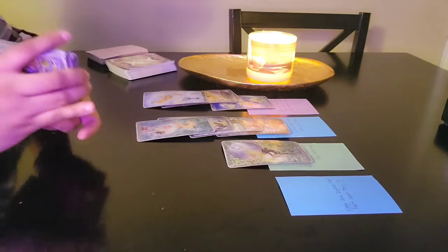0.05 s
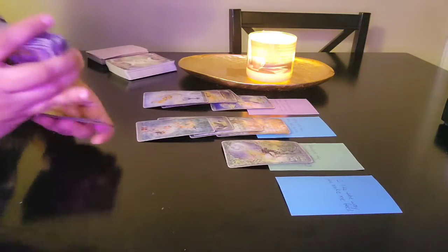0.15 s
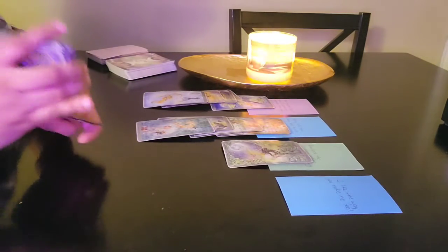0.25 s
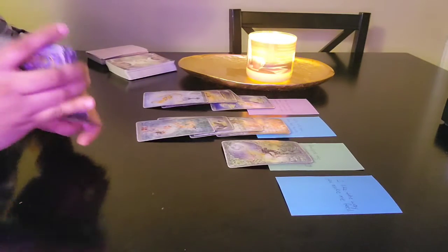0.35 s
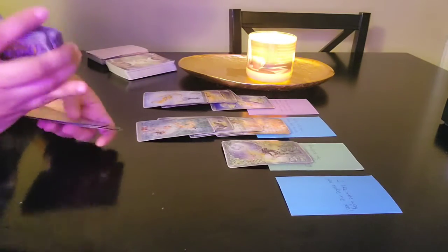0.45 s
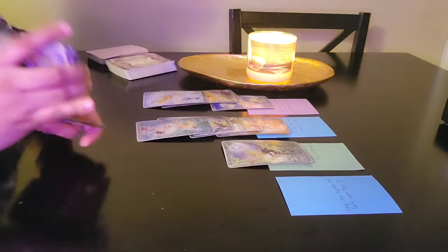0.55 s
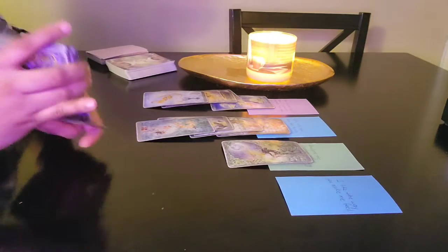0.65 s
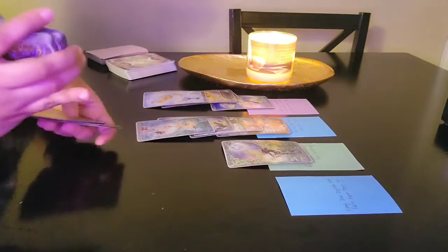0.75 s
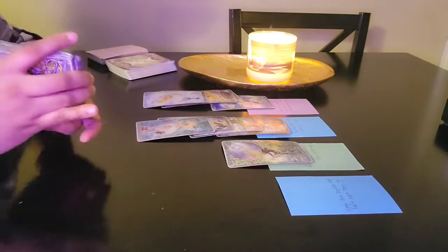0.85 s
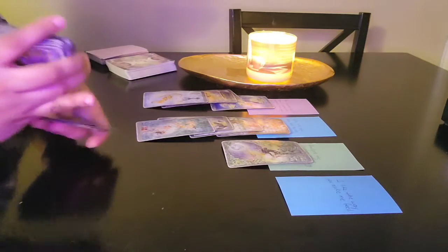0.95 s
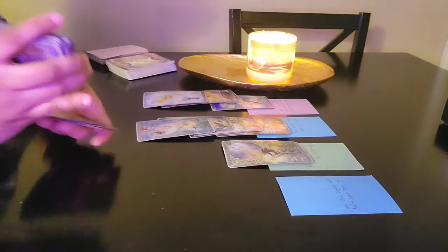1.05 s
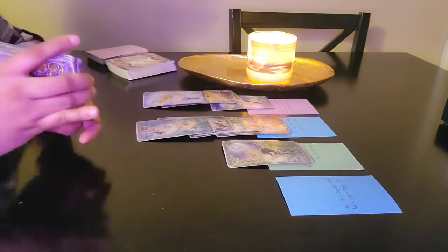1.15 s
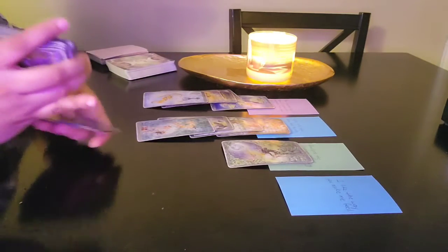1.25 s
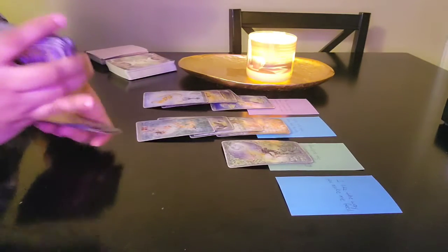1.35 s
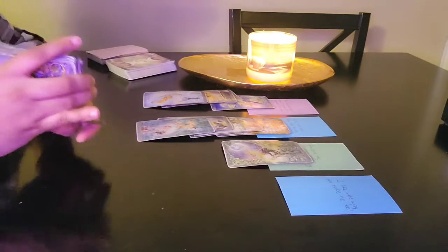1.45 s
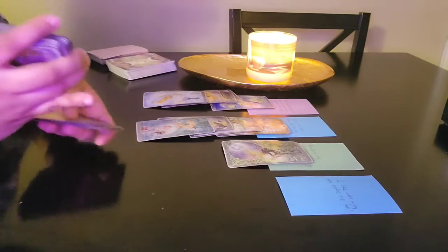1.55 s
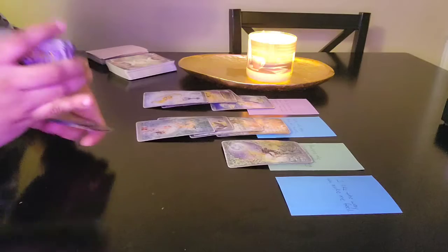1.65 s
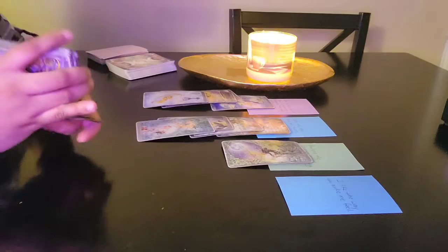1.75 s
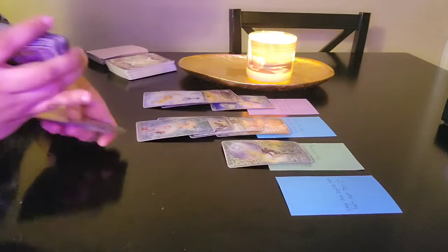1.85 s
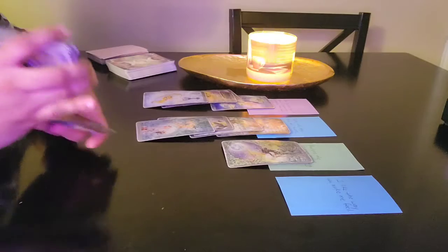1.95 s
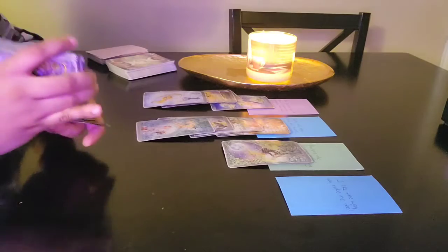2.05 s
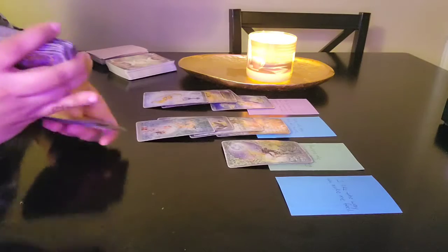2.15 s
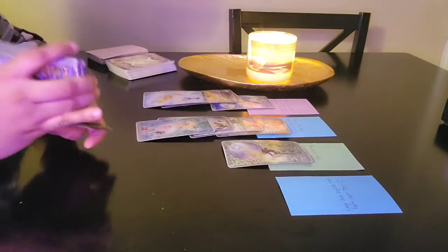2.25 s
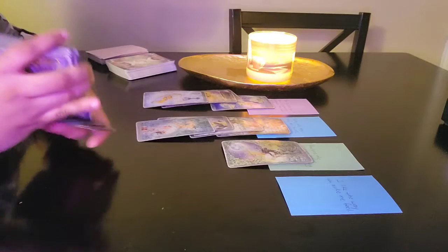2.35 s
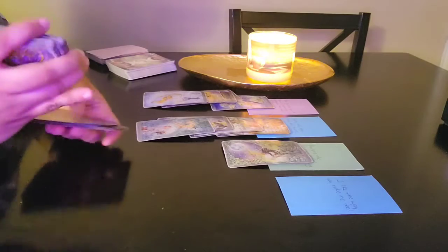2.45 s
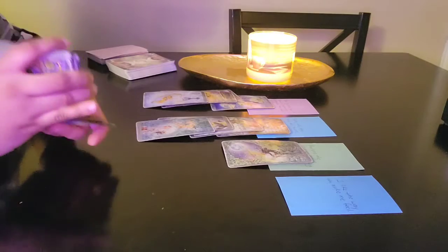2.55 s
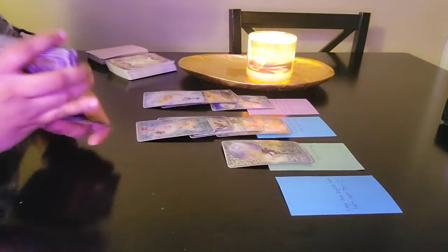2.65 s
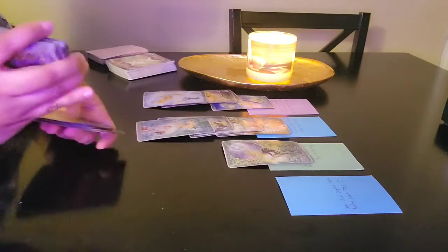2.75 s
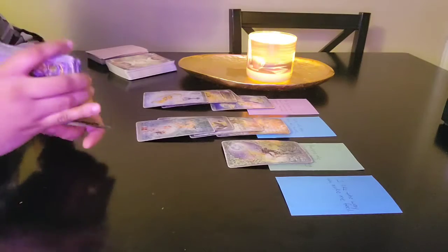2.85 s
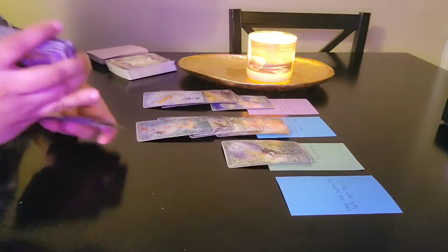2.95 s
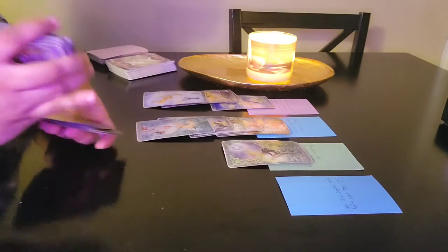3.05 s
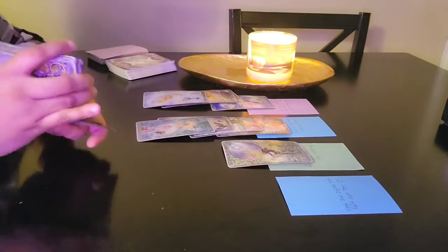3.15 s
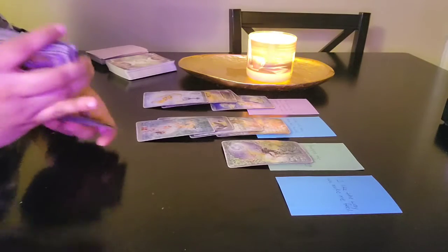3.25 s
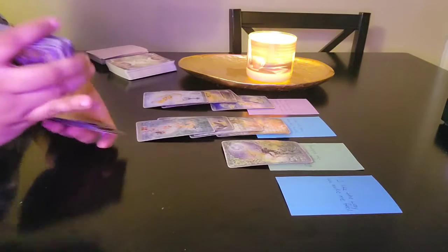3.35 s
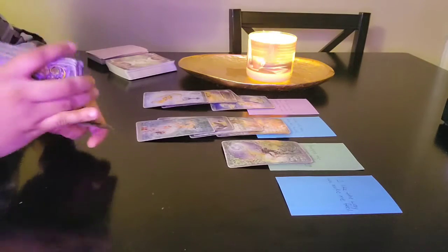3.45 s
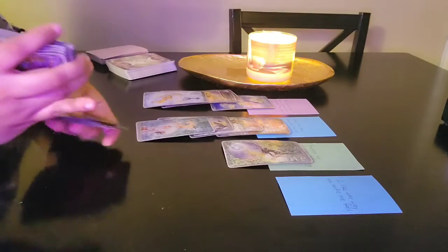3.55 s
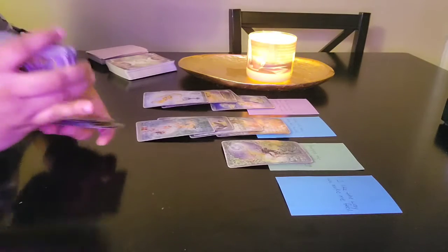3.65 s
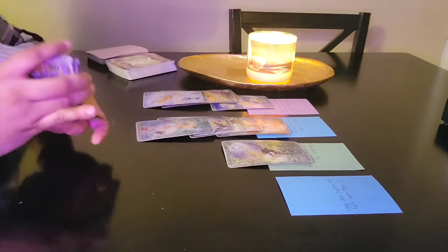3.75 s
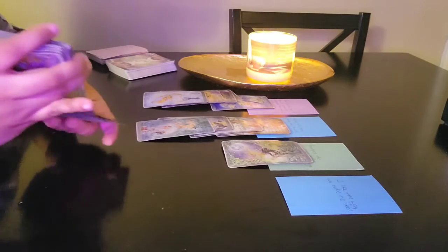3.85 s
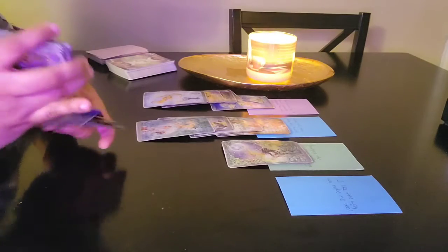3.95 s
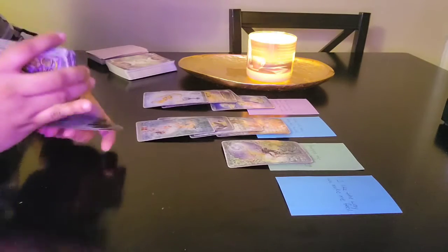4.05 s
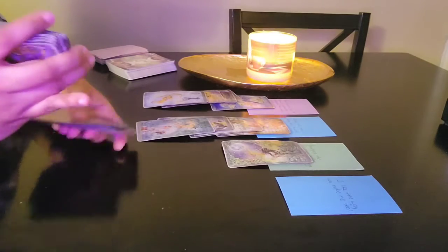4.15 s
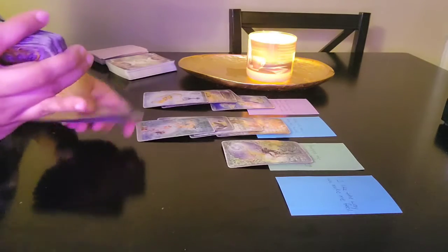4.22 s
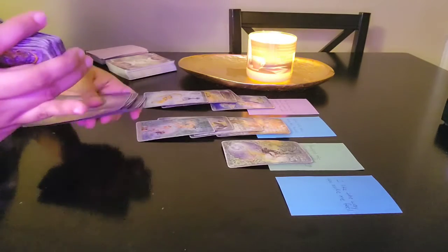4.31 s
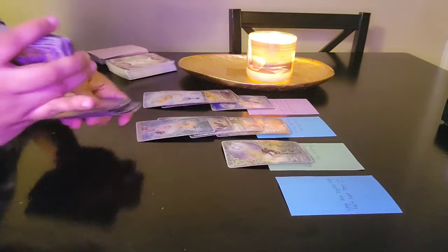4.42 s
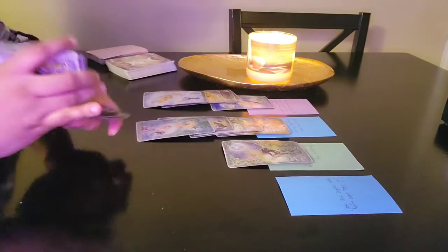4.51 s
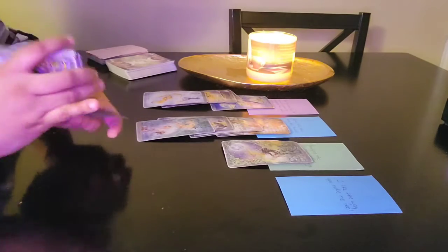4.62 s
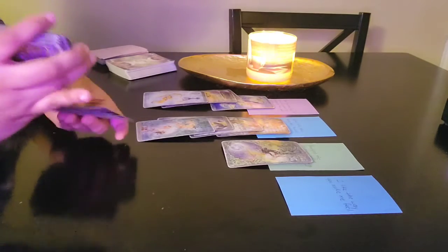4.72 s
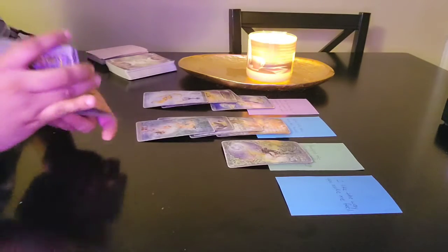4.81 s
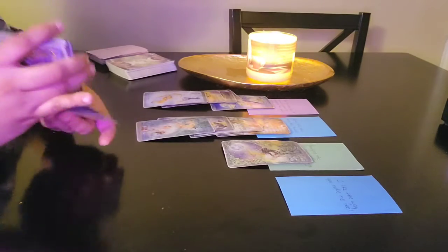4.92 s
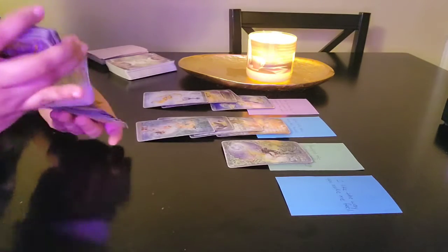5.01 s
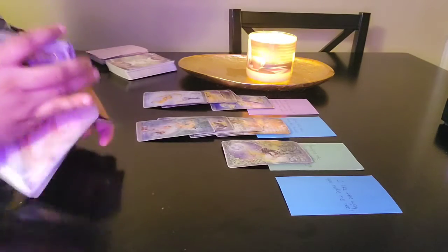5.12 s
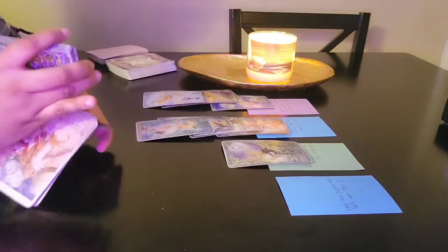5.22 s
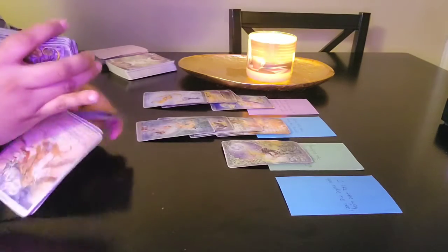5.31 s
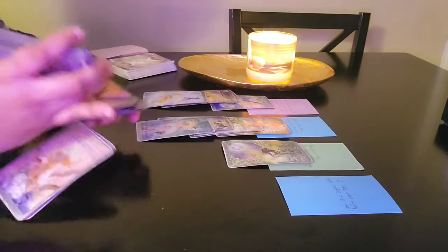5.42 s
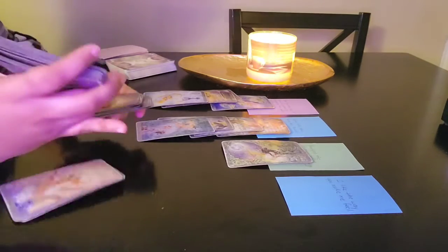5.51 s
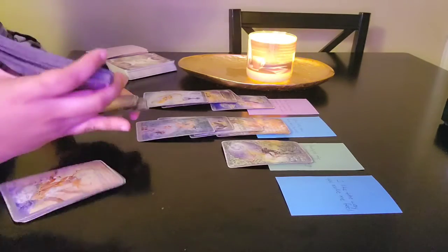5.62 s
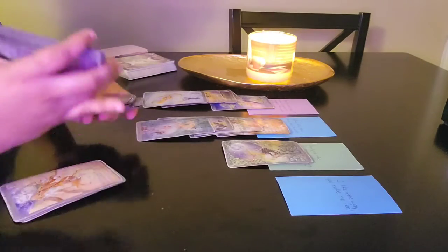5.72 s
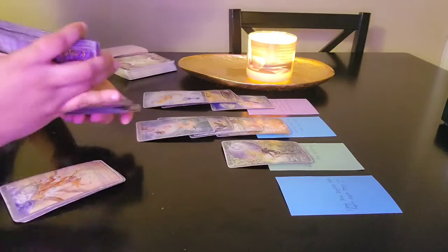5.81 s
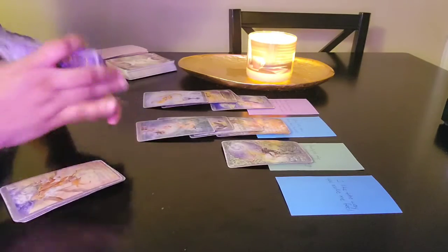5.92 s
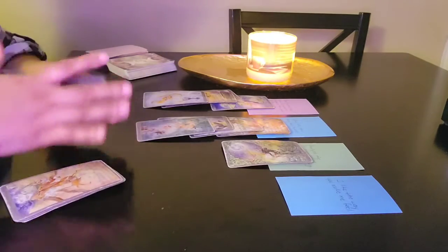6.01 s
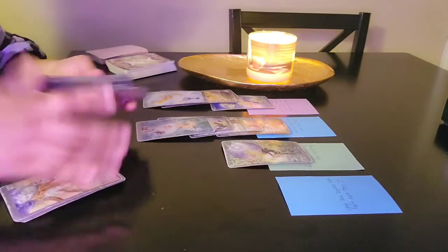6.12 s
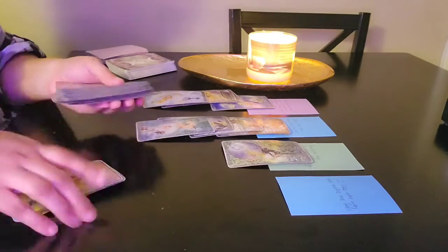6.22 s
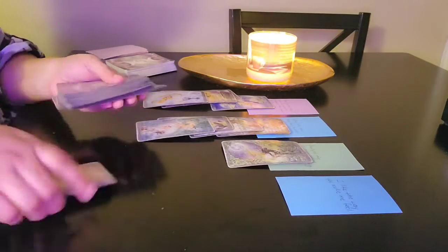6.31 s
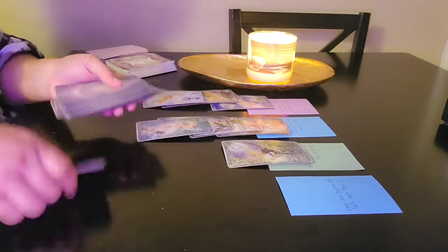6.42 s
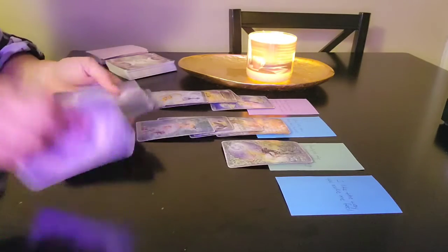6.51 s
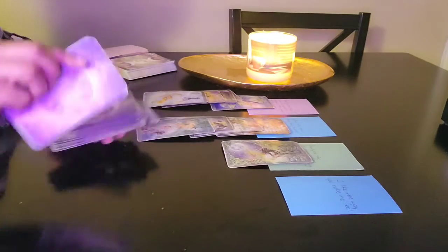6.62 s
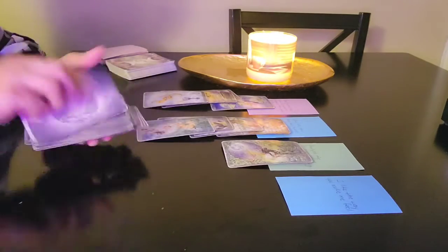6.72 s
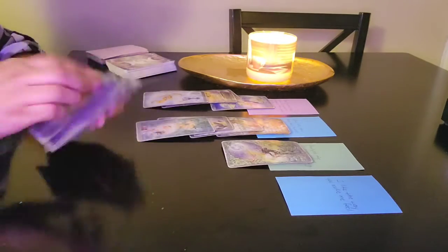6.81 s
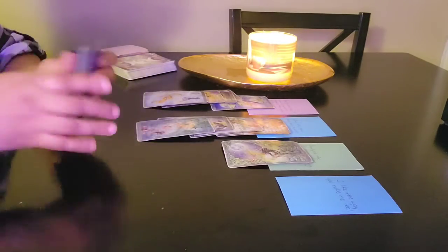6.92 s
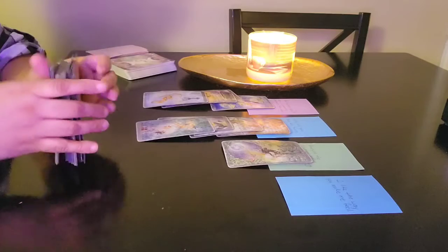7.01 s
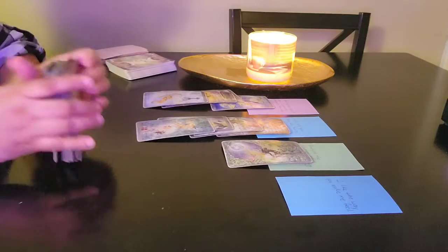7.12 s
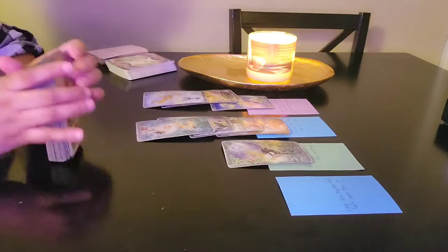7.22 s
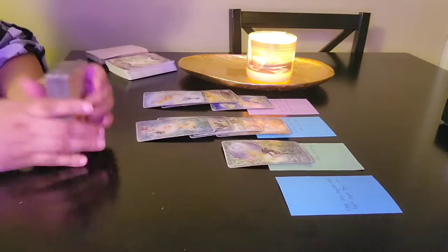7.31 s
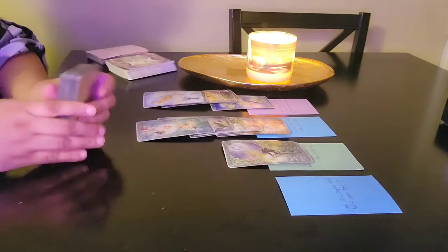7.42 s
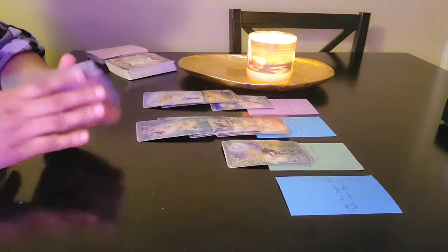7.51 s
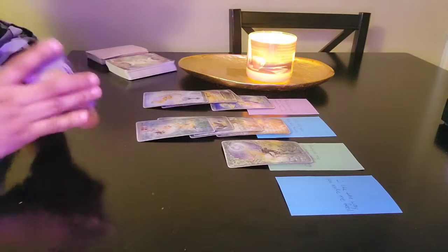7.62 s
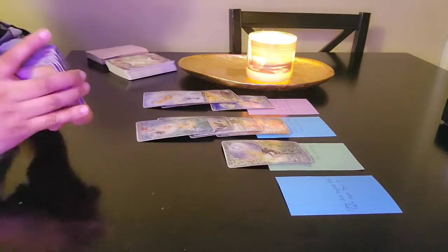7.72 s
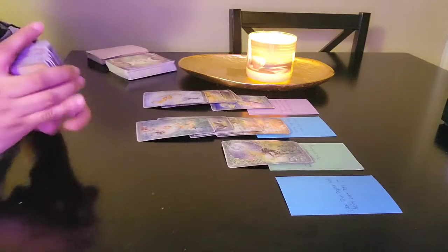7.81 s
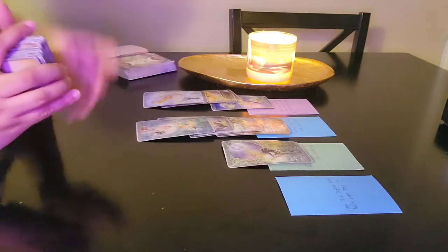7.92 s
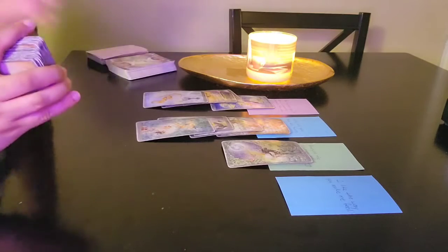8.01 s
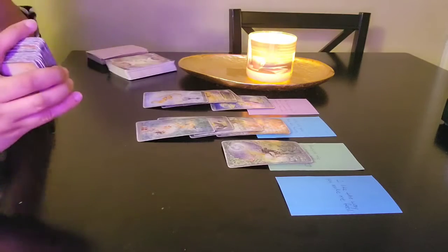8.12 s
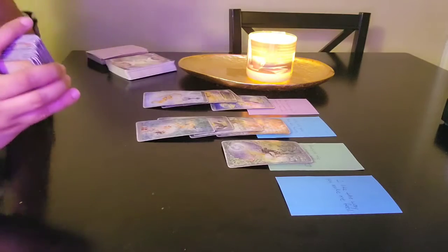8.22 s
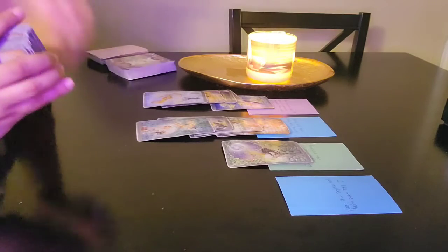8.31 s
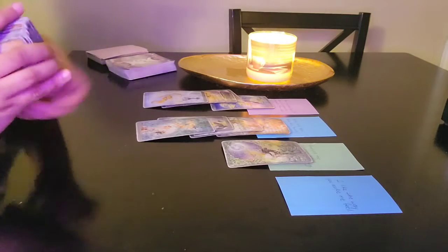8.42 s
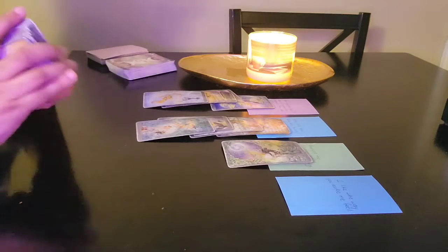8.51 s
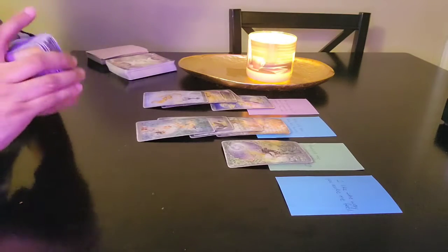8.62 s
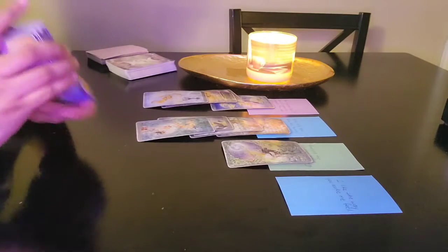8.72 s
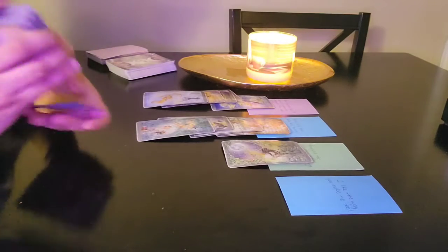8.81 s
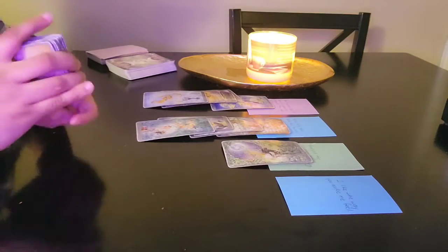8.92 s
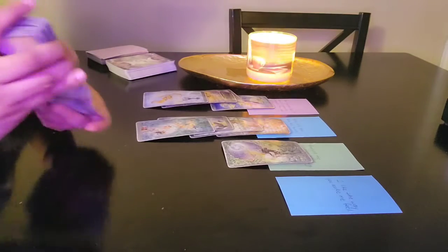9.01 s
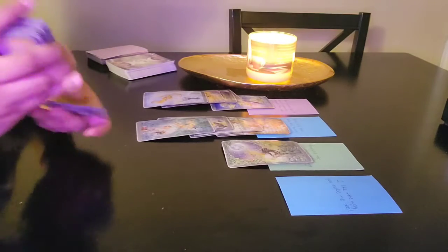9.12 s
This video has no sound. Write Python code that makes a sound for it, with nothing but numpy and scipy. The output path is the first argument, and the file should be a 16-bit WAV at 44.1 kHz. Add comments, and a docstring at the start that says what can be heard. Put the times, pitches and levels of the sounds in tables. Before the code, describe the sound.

Hands quickly overhand shuffle stiff cards: soft tick, swelling rub, bright snap and slap, repeated evenly. The shuffling then grows sparse, with light rustles, a soft card landing on the tabletop, and faint sliding friction. The deck is tapped twice hard on wood, quiet handling fades, and shuffling restarts with strong slaps at the end. Close, dry pickup with short room reflections and low quiet background air.

```python
"""Overhand card shuffle

Hands shuffle a deck of large cards above a wooden table: packets rub out as hiss, and ringing air pockets clap.
One card drops, cards skid on the table top, and two hard knocks, noise bursts over wood modes, square the deck.
A small bare room answers with decaying noise over a soft murmur of filtered noise.
"""
import sys
import numpy as np
from scipy import signal
from scipy.fft import rfft, irfft, next_fast_len
from scipy.io import wavfile
from scipy.ndimage import uniform_filter1d, minimum_filter1d, map_coordinates

SR = 44100
rng = np.random.default_rng(int(sys.argv[2]) if len(sys.argv) > 2 else 0)


def to_wav(s):
    """Save 16-bit WAV."""
    ch = np.atleast_2d(s).T  # columns
    pcm = np.round(np.clip(ch, -1, 1) * 32767)  # PCM
    wavfile.write(sys.argv[1], SR, pcm.astype(np.int16))


N = 403956

# Hard meetings of card edges and faces. Each row: time in seconds, clap in dB, air pocket in Hz, edge snap in dB.
FLICKS = [(0.0099, -13.5, 870, -23), (0.171, -21, 3200, -29),(0.207, -18.5, 2800, -23),
          (0.2233, -14, 2730, -13.5), (0.2624, -10, 3120, -13), (0.2833, -8, 2160, -8),
          (0.4936, -26, 3510, -13), (0.5439, 0.5, 3660, -32), (0.5585, -6, 2210, -4),
          (0.7805, -6, 4780, -8), (0.8255, -21, 2180, -15), (0.835, -22, 2530, -5.5),
          (0.8511, -2, 1920, -4), (1.047, -17, 3140, -22.5), (1.109, -2, 3770, -3),
          (1.1229, 0.5, 2240, -4.5), (1.1315, -11.5, 1320, -18), (1.329, -17, 3300, -20),
          (1.3354, -17, 3770, -17.5), (1.3935, -13, 930, -6.5), (1.4085, 1.5, 1860, -5.5),
          (1.6364, -10.5, 3560, -14), (1.6726, -3.5, 1980, -5), (1.6811, 0.5, 1970, -33),
          (1.6945, -4, 2090, -4), (1.916, -33, 2054, -14.5), (1.9561, -11, 830, -11.5),
          (1.9624, 2.5, 3600, -13.5), (1.979, 1.5, 2070, -13), (1.9835, -3, 1760, -8),
          (2.209, -11, 2110, -16.5), (2.246, -18, 1500, -21.5), (2.253, -0.5, 3350, -31.5),
          (2.2734, 1.5, 1450, -4), (2.47, -3.5, 3350, -16), (2.5324, -15.5, 730, 0.5),
          (2.5454, 8.5, 2030, -16), (2.5489, -3, 2040, -5.5), (2.7489, -14, 3800, -26.5),
          (2.7978, -6, 2000, -18.5), (2.8085, 0, 1990, -2), (2.8159, -7.5, 1730, -3.5),
          (2.8201, -2, 1960, -30), (2.825, 4, 2040, 0.5), (3.0496, -11.5, 1980, -13.5),
          (3.087, -4.5, 1550, -16), (3.0912, -2.5, 1680, -8.5), (3.1153, -2, 1560, 1.5),
          (3.334, -11, 3420, -16), (3.3977, -15, 1700, -13.5), (3.4223, -2.5, 1080, -2),
          (3.6259, -4, 3100, -14.5), (3.6935, -3, 2410, -9), (3.7076, 6, 2150, -30), (3.7121, -4, 1820, -7),
          (3.8891, -16, 3800, -13), (3.9906, 0.5, 2520, 1.5), (4.0701, -18, 1200, -26.5),
          (4.104, -26, 1400, -13.5), (4.1315, 9.5, 1820, 6.5), (4.192, -25, 4500, -18.5),
          (4.7054, -1, 2120, -26.5), (4.9987, -9, 2320, -16.5), (5.0217, -10, 3530, -17.5),
          (5.1985, -12, 1510, -28.5), (5.2088, -9.5, 1530, -27), (5.2563, -4.5, 2580, -5.5),
          (5.2632, -3, 2410, -33), (5.2699, -4, 1750, -10), (5.2795, -3, 2020, -8), (5.6279, -8, 2740, -14),
          (5.6369, -6.5, 1750, -4), (5.645, -2, 2260, -22), (6.0887, -2.5, 2510, -6.5),
          (6.1759, -22.5, 720, -22), (6.2709, -19, 4000, -9.5), (6.287, -4, 920, 4.5),
          (6.522, -12, 1500, -24), (6.5388, -10, 2280, -22), (6.555, -18, 2200, -24),
          (6.8792, -1, 1820, -7.5), (8.878, 5, 1890, 1.5), (8.889, -4.5, 1770, -19.5),
          (8.8965, 3.5, 3850, -10), (9.0518, -23, 890, -17.5), (9.0705, -7, 2510, -15),
          (9.077, -12.5, 990, -13.5), (9.0872, -29, 9000, -11.5), (9.1112, 4, 3900, 1.5),
          (9.125, -3.5, 1740, -17)]
# Packets thumbed off with a tick, then sliding until they land.
# Each row: thumb in seconds, tick in dB, landing in seconds, rub at landing in dB.
PASSES = [(0.186, -21.5, 0.28, -29.5), (0.463, -23.5, 0.554, -28.5), (0.735, -30, 0.852, -26),
          (1.026, -30, 1.132, -26.5), (1.3066, -24, 1.413, -26.5), (1.5925, -25.5, 1.698, -25.5),
          (1.8647, -29, 1.973, -25.5), (2.156, -27.5, 2.263, -26), (2.4398, -26, 2.554, -27),
          (2.72, -25, 2.825, -25), (3, -23, 3.115, -23), (3.297, -23, 3.413, -26.5),
          (3.6035, -25.5, 3.709, -28.5), (3.964, -28, 4.002, -29.5), (5.253, -35, 5.279, -26),
          (5.614, -32, 5.648, -32), (6.252, -37, 6.285, -28), (6.846, -23.5, 6.888, -28.5),
          (8.771, -52, 8.897, -26), (9.0302, -29, 9.135, -25.5)]
# Loose handling between passes, each stroke fading. Each row: start in seconds, stop in seconds, first level in dB.
HANDLING = [(0.0, 0.012, -26.5), (3.885, 3.96, -41.5), (4.01, 4.21, -34), (4.672, 4.732, -37),
            (4.756, 4.794, -40.5), (4.992, 5.09, -44), (5.096, 5.155, -36), (5.189, 5.208, -33.5),
            (5.322, 5.382, -43), (5.437, 5.48, -41), (5.487, 5.552, -44.5), (6.065, 6.148, -37),
            (6.518, 6.657, -37.5), (7.039, 7.137, -50.5), (7.618, 7.727, -49), (7.749, 7.776, -45.5), ]
# Cards skidding flat on the table, fading.
# Each row: start in seconds, stop in seconds, first level in dB, last level in dB, trapped air in Hz.
SKIDS = [(6.41, 6.512, -44.5, -46, 1970), (6.531, 6.853, -44.5, -51, 2030), (6.564, 6.655, -51, -58, 6460),
         (6.744, 6.77, -46, -49.5, 4260)]
# Deck or card landing on the table top. Each row: time in seconds, blow in dB, thud in dB.
KNOCKS = [(5.4, -26, -34), (5.635, -10.5, -16.5), (6.53, -18, -21), (6.878, -15, -25), (7.135, 2.5, -42),
          (7.148, 6.5, -31), (7.162, 18.5, -15.5), (7.19, 12, -19), (7.384, -1, -34), (7.391, 19, -36)]
# Resonances of the card stack. Each row: centre in Hz before detuning, width in Hz, mean level in dB.
STACK_MODES = [(800, 267, -9.5), (3500, 1100, -19)]
# Low modes of the table top. Each row: centre in Hz, width in Hz, level in dB.
TABLE_MODES = [(99.4, 15, 4), (277, 620, -3)]
# Spectrum of a card edge snapping. Each row: frequency in Hz, density in dB per Hz.
SNAP_SPECTRUM = [(300, -20.5), (1500, -3.5), (4000, -2), (8000, -12.5), (15500, -13.5)]
# Relative spectrum of card rubbing on card. Each row: frequency in Hz, density in dB per Hz.
RUB_SPECTRUM = [(150, -15.5), (500, -10.5), (1900, -6), (6300, -18.5), (15500, -22.5)]
# Relative spectrum of a packet's gliding face. Each row: frequency in Hz, density in dB per Hz.
GLIDE_SPECTRUM = [(600, -12.5), (4000, -3.5), (15500, -1.5)]
# Spectrum of the deck's blow. Each row: frequency in Hz, density in dB per Hz.
BLOW_SPECTRUM = [(90, -43), (880, -12.5), (1300, -10.5), (2000, -2.5), (3100, -12), (4200, -10),
                 (5200, -19), (7000, -27), (15500, -47.5)]
# Reverberation time of the room. Each row: frequency in Hz, 60 dB decay in seconds.
ROOM_T60 = [(150, 0.34), (600, 0.56), (2000, 0.37), (5000, 0.36), (12000, 0.38)]
# Relative return from the walls. Each row: frequency in Hz, level in dB.
WALL_RETURN = [(200, 3), (2000, -5), (5000, -7.5), (15000, -16)]
# Relative spectrum of the room air. Each row: frequency in Hz, density in dB per Hz.
AIR_SPECTRUM = [(25, -49.5), (70, -11.5), (204, -23), (262, 2), (295, -6.5), (352, 1.5), (430, -13.5),
                (570, -1.5), (660, -11.5), (730, -1.5), (1000, -11.5), (1400, -12), (7000, -31.5),
                (15500, -37)]

FULL_CLAP_DB = 13  # louder claps ring longer; at this level the ring decays half as fast
SLAP_CUT_HZ = 283  # a card is too small to push air below this
TICK_HZ = 2020
RIPPLE_MAX_OVER_RUB_DB, RIPPLE_CENTRE_HZ, RIPPLE_SPREAD_S = 14, 1780, 0.03
SWELL_DB_PER_S, FADE_DB_PER_S = 263.5, 46.5  # passes grow, loose strokes fade
GLIDE_DELAY_S, GLIDE_RISE_S, GLIDE_DECAY_S = 0.026, 0.015, 0.042
GLIDE_RE_RUB_DB = -19.5
SKID_WIDTH_HZ, SKID_UPPER_RATIO, SKID_UPPER_DB = 460, 1.79, -13.5
WALL_DELAY_S, WALL_DB, WALL_CUT_HZ = 0.0076, -10, 5000
AIR_DB = -53
MIC_CUT_HZ, TOP_HZ = 110, 15600
PEAK_LIMIT = 0.64


def amp(db):
    """dB to gain."""
    return 10 ** (np.asarray(db) / 20)


def unit(x):
    """Scale to rms 1."""
    return x / np.sqrt(np.mean(x ** 2) + 1e-20)


def along(points, hz):
    """Interpolate (Hz, value) points on a log frequency axis."""
    f, v = np.transpose(points)
    return np.interp(np.log(hz + 1), np.log(f + 1), v)


def wobble(knots_per_s):
    """Smooth random curve through normally distributed knots."""
    knots = rng.standard_normal(int(N * knots_per_s / SR) + 4)
    return map_coordinates(knots, [np.arange(N) * knots_per_s / SR])


def filtered(x, response):
    """Multiply the spectrum of x by a response of frequency."""
    m = next_fast_len(len(x) + SR // 4)
    hz = np.fft.rfftfreq(m, 1 / SR)
    return irfft(rfft(x, m) * response(hz), m)[:len(x)]


def coloured(x, spectrum):
    """Shape x by (Hz, dB) points."""
    return filtered(x, lambda hz: amp(along(spectrum, hz)))


def bass_cut(x, cut_hz):
    """Two cascaded first-order high-pass filters."""
    return filtered(x, lambda hz: (1j * hz / (cut_hz + 1j * hz)) ** 2)


def resonance(hz, centre_hz, width_hz):
    """Response of a damped mode, 1 at its centre."""
    damping = 1j * hz * width_hz
    return damping / (centre_hz ** 2 - hz ** 2 + damping)


def placed(times_s, bursts):
    """Sum rows of short sounds at their times."""
    at = np.round(times_s * SR).astype(int)[:, None] + np.arange(bursts.shape[1])
    return np.bincount(at.ravel(), bursts.ravel(), N + SR)[:N]


def contacts():
    """Card impacts: hard flicks, a tick opening each pass, a patter of loose cards before each landing."""
    thumb_s, tick_db, landing_s, rub_db = np.transpose(PASSES)[:, :, None]
    ticks = np.hstack([thumb_s, tick_db, np.full_like(thumb_s, TICK_HZ), tick_db])
    early, softness, pitch = np.moveaxis(rng.random((len(PASSES), 5, 3)), 2, 0)
    time_s = landing_s - RIPPLE_SPREAD_S * early
    clap_db = rub_db + RIPPLE_MAX_OVER_RUB_DB - 10 * softness
    pocket_hz = RIPPLE_CENTRE_HZ * 3 ** (pitch - 0.5)
    patter = np.stack([time_s, clap_db, pocket_hz, clap_db - 13], axis=2)
    return np.vstack([FLICKS, ticks, patter.reshape(-1, 4)])


def flicks():
    """Air squeezed between two cards rings briefly and shakes the stack; the edge adds a bright snap."""
    time_s, clap_db, pocket_hz, snap_db = contacts().T[:, :, None]
    t = np.arange(SR // 25) / SR
    damping = 0.75 / (1 + amp(clap_db - FULL_CLAP_DB))  # a fuller clap seals a longer-ringing pocket
    clap = np.sin(2 * np.pi * pocket_hz * t) * np.exp(-damping * pocket_hz * t)
    for centre_hz, width_hz, db in STACK_MODES:
        detune, scatter = rng.standard_normal((len(time_s), 2)).T[:, :, None]
        mode_hz = centre_hz * np.exp(0.28 * detune)
        ring = np.sin(2 * np.pi * mode_hz * t) * np.exp(-np.pi * width_hz * t)
        clap = clap + amp(db + 3 * scatter) * ring
    clap = clap * (1 - np.exp(-t / 0.0006))  # soft onset
    snap = rng.standard_normal(clap.shape) * amp(-60 * t / 0.011)
    claps = placed(time_s[:, 0], amp(clap_db) * clap)
    snaps = placed(time_s[:, 0], amp(snap_db) * snap)
    return bass_cut(claps, SLAP_CUT_HZ) + coloured(snaps, SNAP_SPECTRUM)


def strokes():
    """All rubbing as (start s, stop s, first dB, last dB)."""
    passes = [(a, b, db - SWELL_DB_PER_S * (b - a), db) for a, _, b, db in PASSES]
    handling = [(a, b, db, db - FADE_DB_PER_S * (b - a)) for a, b, db in HANDLING]
    return passes + handling


def slide():
    """Coated card rubs on card: an unevenly gripping hiss with scattered catches of single edges."""
    level = np.zeros(N)
    for start_s, stop_s, first_db, last_db in strokes():
        stroke = level[round(start_s * SR):round(stop_s * SR)]
        stroke += amp(np.linspace(first_db, last_db, len(stroke)))
    hiss = rng.standard_normal(N) * amp(2.5 * wobble(45) + 2.2 * wobble(250))
    catches = (rng.random(N) < 150 / SR) * rng.standard_normal(N) * amp(15)  # 150 a second on average
    settle = np.exp(-1 / (0.014 * SR))  # the packet comes to rest over a moment
    settling = signal.lfilter([1 - settle], [1, -settle], level)
    level = np.maximum(uniform_filter1d(level, size=SR // 150), settling)
    return level * unit(coloured(hiss + catches, RUB_SPECTRUM))


def glide():
    """The packet's face sweeps over the deck as a smooth bright hiss, dying away after landing."""
    t, level = np.arange(N) / SR, np.zeros(N)
    for thumb_s, _, landing_s, rub_db in PASSES:
        rise = np.clip((t - thumb_s - GLIDE_DELAY_S) / GLIDE_RISE_S, 0, 1)
        decay = np.exp(-np.maximum(t - landing_s, 0) / GLIDE_DECAY_S)
        level += amp(rub_db + GLIDE_RE_RUB_DB) * decay * rise
    level = uniform_filter1d(level, size=SR // 200) * amp(1.5 * wobble(30))
    return level * unit(coloured(rng.standard_normal(N), GLIDE_SPECTRUM))


def skid():
    """Friction hiss coloured by two resonances of the thin air under a card."""
    out, t = np.zeros(N), np.arange(N) / SR
    for start_s, stop_s, first_db, last_db, air_hz in SKIDS:
        def gap(hz):
            """Lower resonance minus a weaker upper one."""
            upper = resonance(hz, SKID_UPPER_RATIO * air_hz, SKID_WIDTH_HZ)
            return resonance(hz, air_hz, SKID_WIDTH_HZ) - amp(SKID_UPPER_DB) * upper
        level = amp(np.interp(t, [start_s, stop_s], [first_db, last_db])) * (t > start_s) * (t < stop_s)
        out += uniform_filter1d(level, size=SR // 50) * unit(filtered(rng.standard_normal(N), gap))
    return out * amp(2.4 * wobble(40))


def knocks():
    """Cards landing on one another give a noise burst; a short push rings the table modes."""
    time_s, blow_db, thud_db = np.transpose(KNOCKS)[:, :, None]
    t = np.arange(SR // 10) / SR
    steps = rng.standard_normal((len(time_s), len(t) // 63))
    clatter = amp(4.5 * np.repeat(steps, 63, axis=1))  # level jumps every 63 samples
    burst = clatter * rng.standard_normal(clatter.shape)
    burst = burst * amp(-60 * t / 0.046) * (1 - np.exp(-t / 0.006))
    push = np.hanning(SR // 400) * amp(thud_db)
    wood = lambda hz: sum(amp(db) * resonance(hz, centre, width) for centre, width, db in TABLE_MODES)
    blows = coloured(placed(time_s[:, 0], amp(blow_db) * burst), BLOW_SPECTRUM)
    thuds = filtered(placed(time_s[:, 0], push), wood)
    return blows, thuds


def near_wall(claps):
    """A delayed, dulled first echo, which returns once more."""
    def wall(hz):
        """One trip to the wall and back."""
        return amp(WALL_DB) * np.exp(-2j * np.pi * hz * WALL_DELAY_S) / (1 + 1j * hz / WALL_CUT_HZ)
    return filtered(claps, lambda hz: wall(hz) + wall(hz) ** 2)


def room(x):
    """Each frequency dies at its own speed; the hands move, so each quarter second finds new echoes."""
    step, wet = SR // 4, np.zeros(N + 2 * SR)
    for start in range(0, N, step):
        hz, t, noise = signal.stft(rng.standard_normal(SR * 3 // 4), SR, nperseg=256)
        decay_db = along(WALL_RETURN, hz)[:, None] - 60 * t / along(ROOM_T60, hz)[:, None]
        tail = signal.istft(noise * amp(decay_db), SR, nperseg=256)[1]
        answer = signal.fftconvolve(x[start:start + step], tail / np.linalg.norm(tail))
        wet[start + 260:][:len(answer)] += answer  # 260 samples of pre-delay
    return wet[:N]


def air():
    """The murmur of the quiet room: coloured noise, wavering a little."""
    waver = amp(1.5 * wobble(4) + 1.5 * wobble(15))
    return amp(AIR_DB) * waver * unit(coloured(rng.standard_normal(N), AIR_SPECTRUM))


def scene():
    """Sum close cards, the table under them, the room and its air."""
    blows, thuds = knocks()
    claps = flicks()
    rubbing = slide() + skid() + glide()
    echoes = room(amp(-16) * claps + amp(-11.5) * rubbing + amp(-5.5) * blows)
    return (near_wall(claps) + claps + rubbing + blows + thuds + echoes + air())[None]


def record(dry):
    """The microphone loses bass, a fast limiter holds the peaks, then the band ends."""
    heard = bass_cut(dry[0], MIC_CUT_HZ)
    needed = np.minimum(1, PEAK_LIMIT / (np.abs(heard) + 1e-9))
    held = minimum_filter1d(needed, size=SR // 150)
    gain = uniform_filter1d(held, size=SR // 300)
    return filtered(heard * gain, lambda hz: hz < TOP_HZ)[None]


dry = scene()
out = record(dry)
to_wav(out)
```